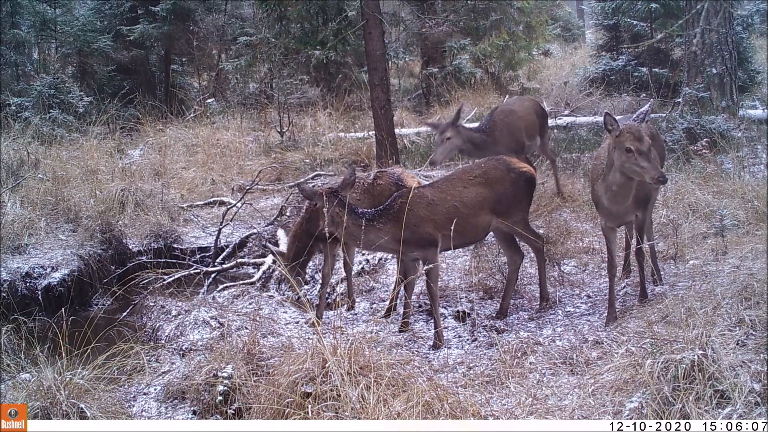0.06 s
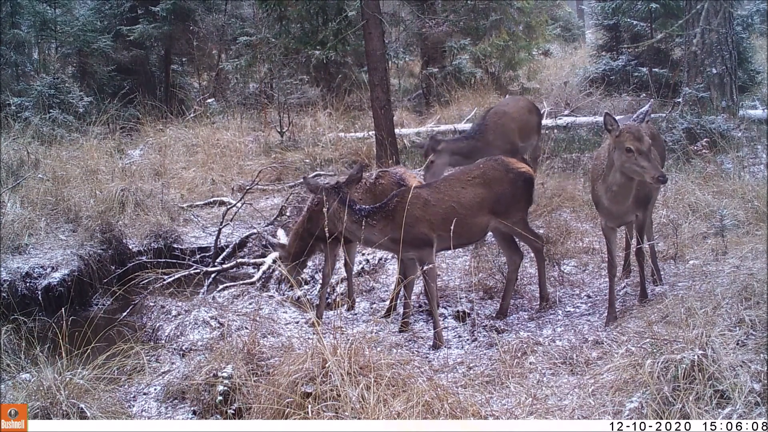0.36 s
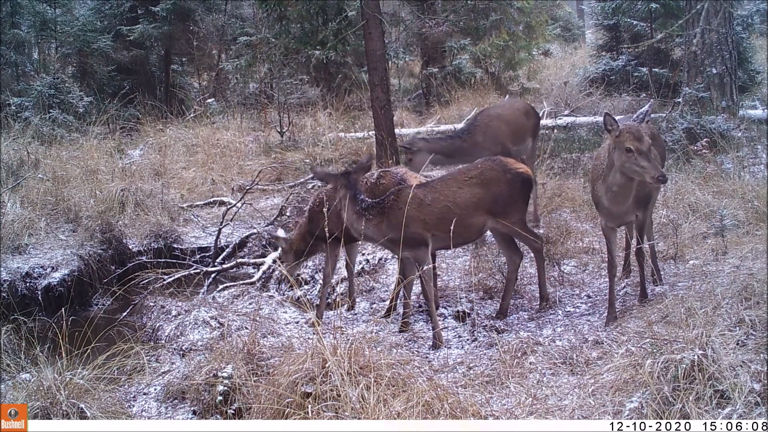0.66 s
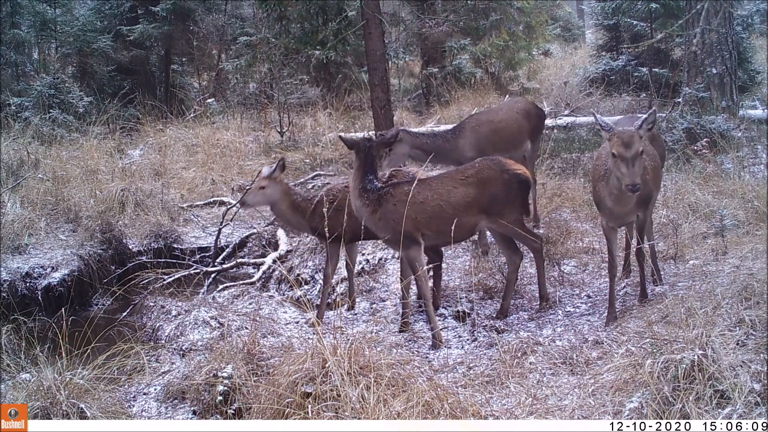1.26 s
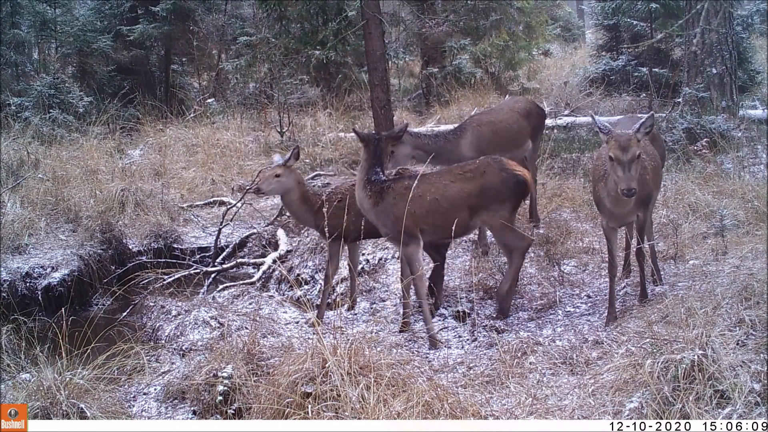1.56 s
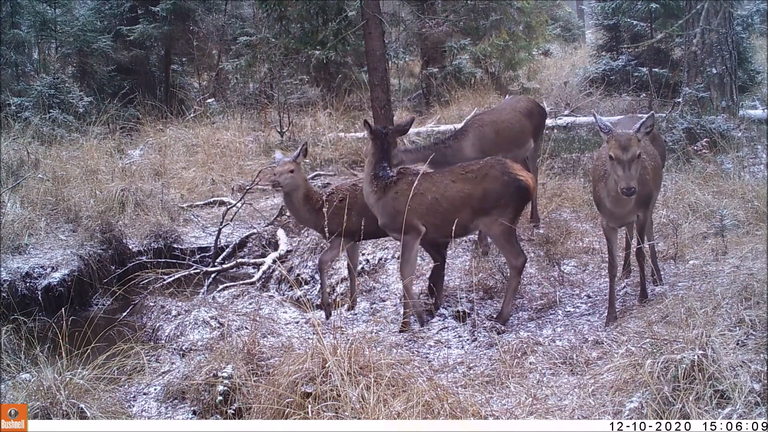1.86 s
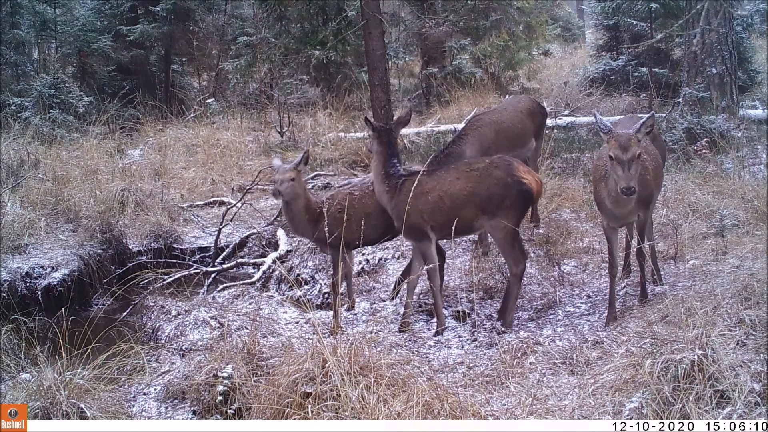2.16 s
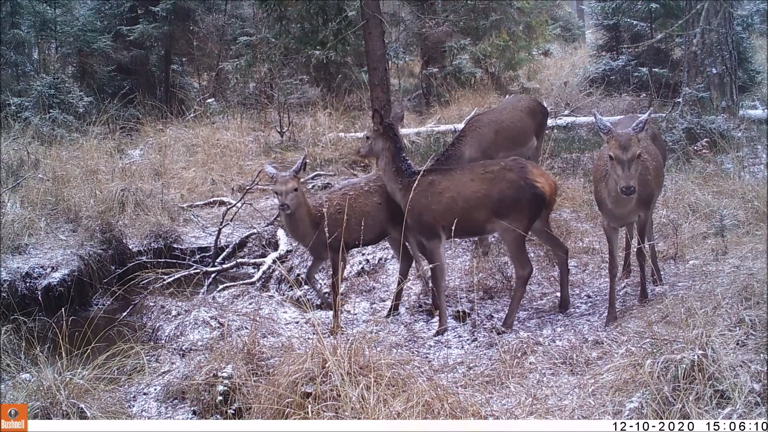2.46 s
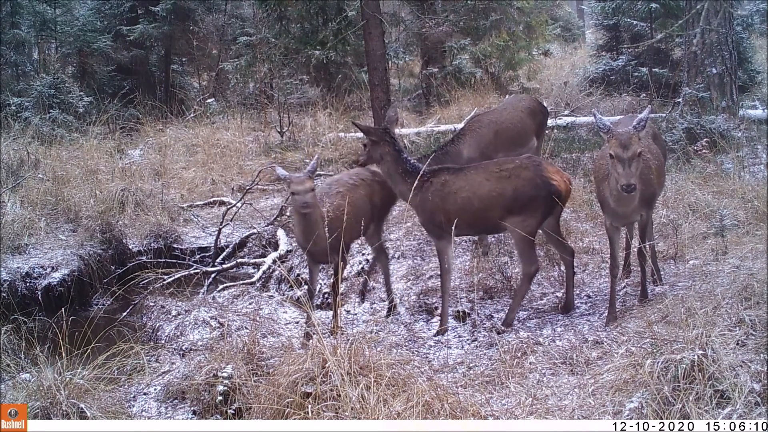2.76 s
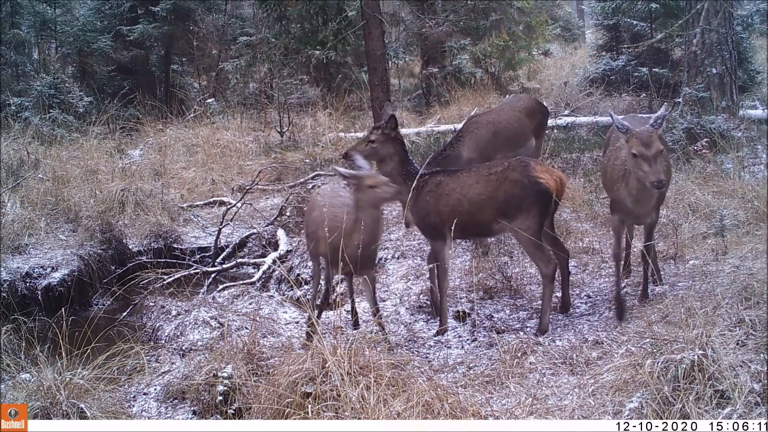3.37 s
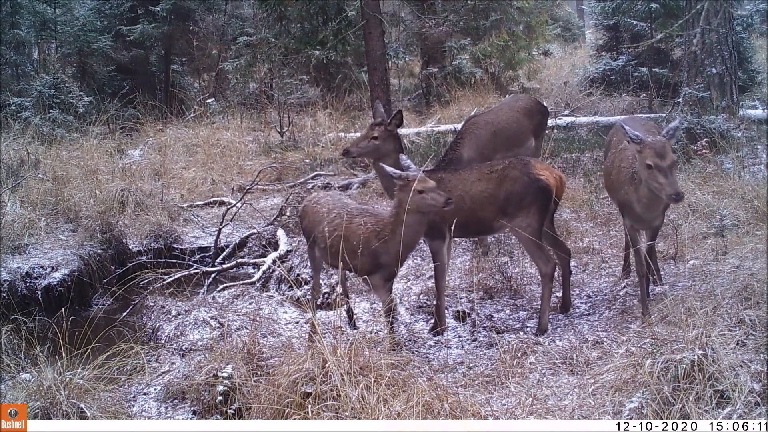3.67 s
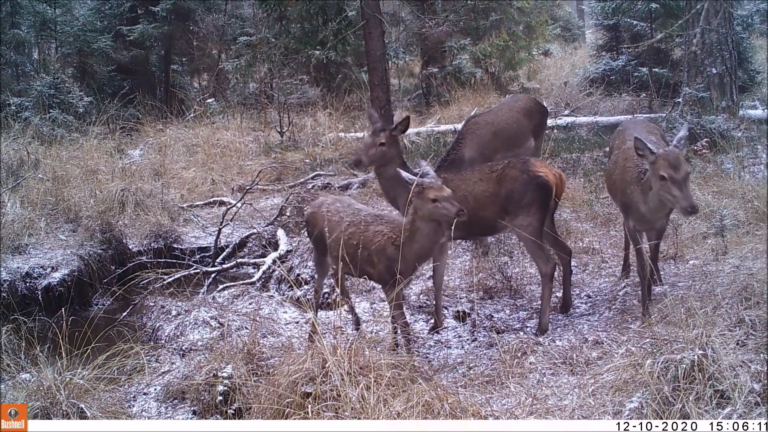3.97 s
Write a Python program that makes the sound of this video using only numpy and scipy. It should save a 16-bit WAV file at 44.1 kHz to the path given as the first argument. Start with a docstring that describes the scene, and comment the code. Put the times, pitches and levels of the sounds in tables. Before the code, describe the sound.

Faint crunching deer steps and tiny stalk snaps over a low hum and hiss.

```python
"""Low rumble, a slow electrical throb and hiss that dips briefly now and then: a trail camera's own noise.
After a second, red deer shift their feet on frosty grass at the forest edge, a few metres away.
Each hoof crushes a cloud of tiny ice grains and now and then snaps a stalk; grass stirs between steps.
Every crunch and snap rings in the camera's microphone port."""
import sys
import numpy as np
from scipy import signal
from scipy.fft import rfft, irfft
from scipy.io import wavfile

SR = 44100
rng = np.random.default_rng(int(sys.argv[2]) if len(sys.argv) > 2 else 0)


def unload_wav(signal):
    """Save mono or channel-first audio to the path in sys.argv[1] as 16-bit WAV at rate SR, clipped to [-1, 1]."""
    wavfile.write(
        sys.argv[1],
        SR,
        np.round(np.clip(np.atleast_2d(signal).T, -1, 1) * 32767).astype(np.int16),
    )


N = 176400
TIME = np.arange(N) / SR
FREQS = np.maximum(np.fft.rfftfreq(N, 1 / SR), 1e-3)


def from_db(db):
    """Decibels to gain."""
    return 10 ** (np.asarray(db) / 20)


def rms_one(x):
    """Scale to rms 1."""
    return x / np.sqrt(np.mean(x ** 2) + 1e-20)


def gain_curve(points):
    """A table of f/Hz, level/dB as a gain at every frequency."""
    hz, db = np.transpose(points)
    return from_db(np.interp(np.log(FREQS), np.log(hz), db))


# the camera's noise floor: f/Hz, level/dB in a 1 Hz band
NOISE_SPECTRUM = [(10, -67.5), (20, -77.5), (35, -69.5), (60, -75.5), (100, -78), (200, -83.5),
                  (400, -91.5), (700, -97.5), (1000, -102), (1500, -106), (2200, -109), (3100, -111.6),
                  (3800, -109.5), (4800, -114.7), (8500, -117.3), (10800, -115), (12500, -117.6),
                  (14000, -118.3)]
def rumble_and_hiss():
    """The camera's own smooth noise, strong in the bass and thinning to hiss."""
    white = rfft(rng.standard_normal(N))
    return irfft(white * gain_curve(NOISE_SPECTRUM) * np.sqrt(SR / 2), N)


# partials of the throb: harmonic number, rms level/dB
THROB_HARMONICS = [(1, -54.5), (2, -61.5), (4, -67), (5, -73.5)]
def electrical_throb(pulse_hz=26.27):
    """A slow pulse in the camera's electronics, with a few overtones."""
    return sum(np.sqrt(2) * from_db(db) * np.sin(2 * np.pi * (harmonic * pulse_hz * TIME + rng.random()))
               for harmonic, db in THROB_HARMONICS)


# brief dips in the hiss: t/s, depth/dB, half width/s
HISS_DIPS = [(.2574, 19, .008), (.471, 12, .008), (1.1959, 23, .006), (1.324, 15, .009), (1.474, 18, .008),
             (1.6865, 20, .008), (2.0495, 20, .007), (2.2838, 18, .008), (2.6686, 21, .007),
             (2.8175, 17, .008), (3.653, 24, .010), (3.759, 34, .008), (3.8825, 17, .006)]
# the share of the sound that goes on through a dip: f/Hz, level/dB (capped at 0)
SPARED_SPECTRUM = [(700, 3.5), (1500, -8.5), (2300, -18.5), (3100, -24.5), (3850, 0.5), (4600, -42),
                   (12200, -16.5), (13200, -1)]
def treble_dips(sound):
    """The treble sinks for a moment while the rumble and a band near 3850 Hz go on."""
    shape = 1.74   # 1 is a cusp, 2 a round hollow
    depth_db = sum(db * np.exp(-np.abs((TIME - t) / width) ** shape) for t, db, width in HISS_DIPS)
    spared = irfft(rfft(sound) * np.minimum(gain_curve(SPARED_SPECTRUM), 1), N)
    return spared + (sound - spared) * from_db(-depth_db)


# resonances of the microphone port: f/Hz, width/Hz, gain/dB
PORT_RESONANCES = [(2975, 580, -1.5), (3760, 645, 11.5), (4300, 1530, -2), (6100, 960, -0.5),
                   (7550, 430, -3.5), (9730, 1740, -0.5), (11530, 1740, -1.5)]
def microphone_port(sound, high=False, split_hz=5000):
    """The port rings at its low resonances, or at its high ones; neighbours alternate in polarity."""
    modes = [(hz, width, db) for hz, width, db in PORT_RESONANCES if (hz > split_hz) == high]
    ringing = 0
    for k, (hz, width, db) in enumerate(modes):
        band = signal.butter(2, [hz - width / 2, hz + width / 2], "band", fs=SR, output="sos")
        ringing += from_db(db) * (-1) ** k * signal.sosfilt(band, sound + 1e-18)
    return ringing


def ice_crunch(grains_per_s, spread_db, high=False):
    """Ice grains break as random clicks, mostly small, a few large, and ring the port; rms 1."""
    sizes = from_db(spread_db * np.minimum(rng.exponential(1, N), 4))
    signs = rng.choice([-1, 1], N)
    breaks = rng.random(N) < grains_per_s / SR
    return rms_one(microphone_port(sizes * signs * breaks, high))


# the herd stirs the grass between steps: t/s, level/dB
STIR_LEVELS = [(0, -89), (1.1, -88.5), (2.0, -93), (2.7, -81), (3.3, -90), (4.0, -93)]
def grass_stir():
    """Faint sparse crackle of grass against legs, a few metres out."""
    level_db = np.interp(TIME, *np.transpose(STIR_LEVELS))
    return from_db(level_db) * ice_crunch(grains_per_s=500, spread_db=5.5)


# frozen stalks breaking underfoot: t/s, level/dB, f/Hz, brightness/dB
STALK_SNAPS = [(1.1422, -54.5, 3850, -14), (1.4074, -62.5, 3900, 2), (1.7835, -60, 3800, -4),
               (1.8015, -58.5, 3950, -8), (1.8675, -62.5, 3900, -10), (1.9807, -59.5, 3650, 0.5),
               (2.1705, -53, 3950, -10), (2.1806, -54.5, 3850, -10), (2.8533, -59, 3600, -10),
               (2.8617, -62, 3500, -10), (2.9605, -55, 3750, 1), (3.0204, -49, 3650, -9),
               (3.092, -58, 3850, -7), (3.189, -60, 3600, -8), (3.406, -61, 3900, -10),
               (3.472, -59, 4000, -6), (3.5494, -56, 4150, -12), (3.5834, -50, 3550, -9),
               (3.9063, -55, 3800, -6)]
def stalk_snaps(ring_s=0.00036, echo_s=0.0062, echo_db=-16):
    """Each stalk rings for a cycle or two, icy ones with a bright click; one near reflection follows."""
    out = np.zeros(N)
    age = np.arange(SR // 50) / SR
    impulse = 1.0 * (age == 0)
    click = microphone_port(impulse, high=True) / np.abs(microphone_port(impulse)).max()
    for t, db, hz, bright_db in STALK_SNAPS:
        ring = microphone_port(np.cos(2 * np.pi * hz * age) * np.exp(-age / ring_s))
        snap = from_db(db) * (ring / np.abs(ring).max() + from_db(bright_db) * click)
        for delay, gain in ((0, 1), (echo_s, from_db(echo_db))):
            start = int((t + delay) * SR)
            out[start:start + len(age)] += gain * snap
    return out


def crust_bursts(burst_s=0.008, spread_db=1):
    """The frozen crust gives way in little bursts: an uneven gain with rms 1."""
    knots = np.arange(0, N / SR + 1, burst_s)
    knot_db = spread_db * rng.standard_normal(4000)[:len(knots)]
    return rms_one(from_db(np.interp(TIME, knots, knot_db)))


# steps and drags a few metres from the microphone:
# t/s of full weight, level/dB, rise/s, fall/s, frost trim/dB
HOOF_STEPS = [(1.395, -75.5, 0.04, .025, 0), (1.54, -77.5, .04, .09, -1), (1.79, -69.5, 0.015, 0.079, 1.5),
              (1.895, -74, 0.025, 0.024, -1), (2.168, -74, 0.027, 0.021, 0), (2.29, -72, 0.035, 0.028, -2),
              (2.492, -65.5, 0.035, 0.055, 2), (2.77, -74.5, 0.022, 0.032, 0),
              (2.853, -69.5, 0.016, 0.024, -5), (2.957, -63.5, 0.011, 0.044, 0.5),
              (3.036, -67, 0.03, 0.045, -1), (3.096, -66, 0.029, 0.041, -1), (3.37, -75, 0.033, .03, -3),
              (3.58, -67.5, 0.031, 0.039, 0.5), (3.646, -67.5, 0.011, 0.032, 5),
              (3.905, -67.5, 0.009, 0.036, 1)]
def hoof_steps(frost_db=-5):
    """Coarse grains and fine frost crunch louder as a hoof takes weight and die away as it settles."""
    coarse_power, frost_power = 0, 0
    for t, db, rise, fall, trim_db in HOOF_STEPS:
        age = TIME - t
        envelope = from_db(db) * np.exp(-(np.minimum(age, 0) / rise) ** 2 - np.maximum(age, 0) / fall)
        coarse_power += envelope ** 2
        frost_power += (envelope * from_db(frost_db + trim_db)) ** 2
    coarse = crust_bursts() * ice_crunch(grains_per_s=950, spread_db=1.3)
    frost = crust_bursts() * ice_crunch(grains_per_s=3800, spread_db=1.5, high=True)
    return np.sqrt(coarse_power) * coarse + np.sqrt(frost_power) * frost


def scene():
    """Deer at the forest edge over the camera's own noise, on one microphone."""
    deer = hoof_steps() + stalk_snaps() + grass_stir()
    camera = rumble_and_hiss() + electrical_throb()
    return treble_dips(deer + camera)[None]


def record(dry):
    """The top of the treble is cut steeply."""
    cutoff_hz = 13850
    return irfft(rfft(dry) / np.sqrt(1 + (FREQS / cutoff_hz) ** 500), N)


dry = scene()
out = record(dry)
unload_wav(out)
```